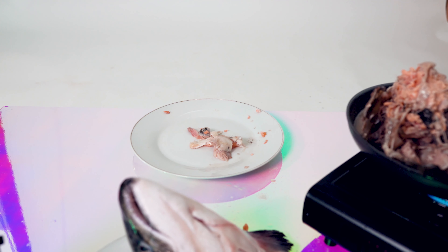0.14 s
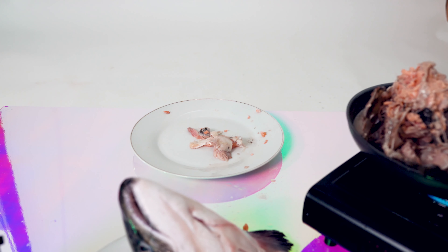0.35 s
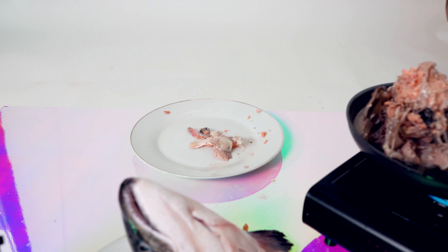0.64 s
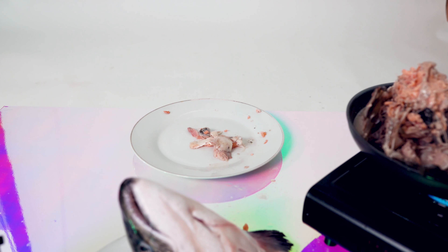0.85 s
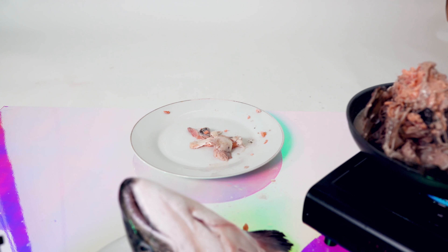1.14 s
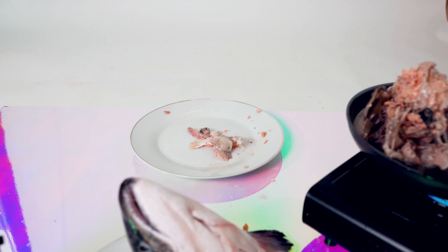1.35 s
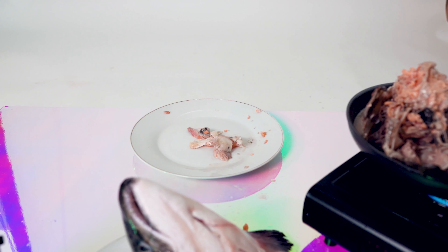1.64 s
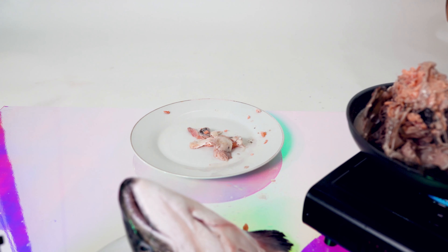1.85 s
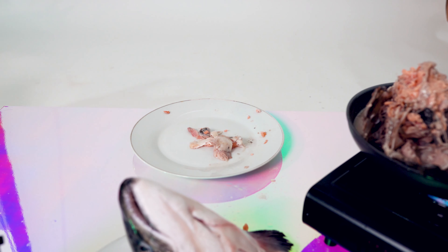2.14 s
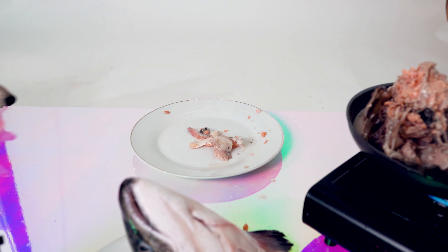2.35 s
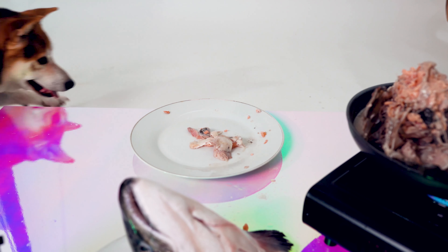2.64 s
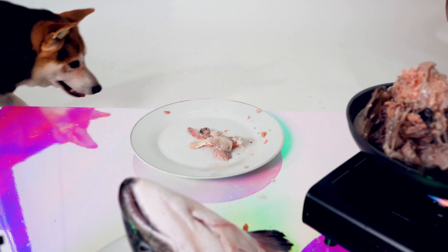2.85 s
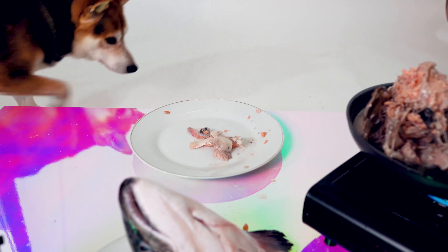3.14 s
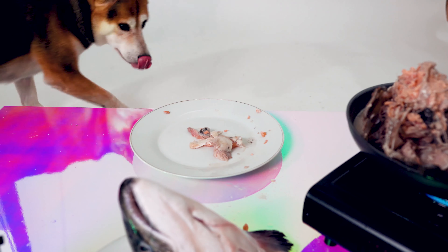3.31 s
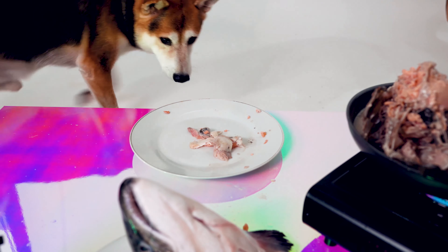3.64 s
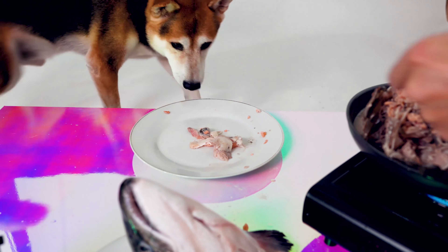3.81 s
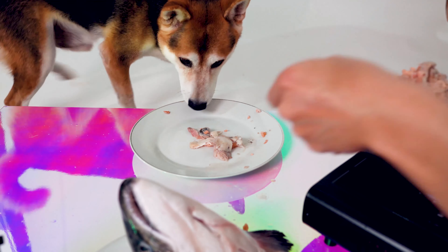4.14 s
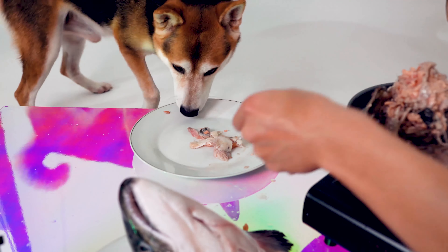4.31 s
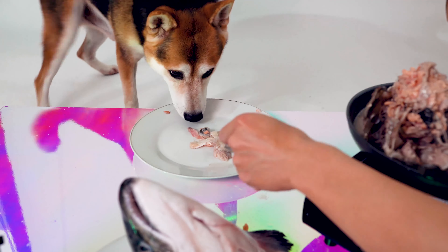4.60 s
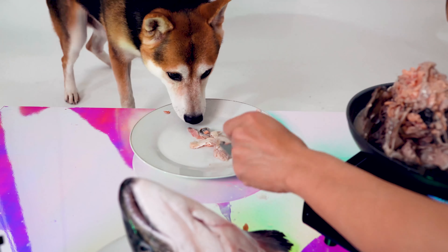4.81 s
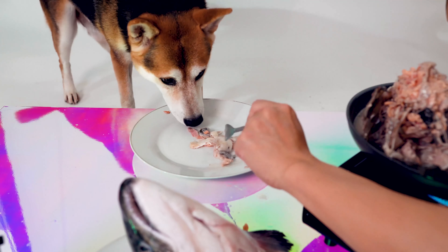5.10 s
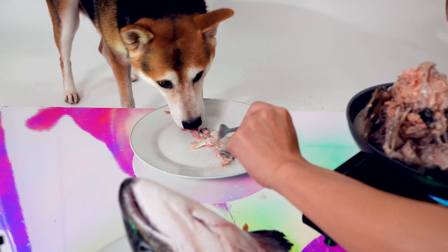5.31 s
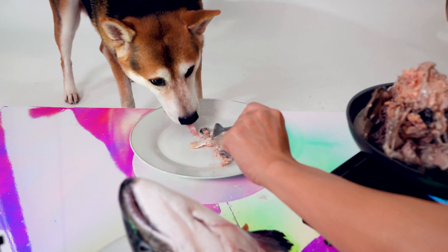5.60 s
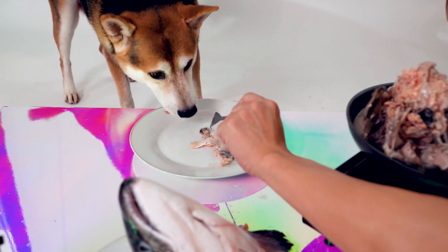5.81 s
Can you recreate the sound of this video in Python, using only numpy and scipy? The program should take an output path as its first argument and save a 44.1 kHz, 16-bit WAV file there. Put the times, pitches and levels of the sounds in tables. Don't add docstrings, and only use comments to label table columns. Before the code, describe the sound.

Metal tags chink sharply, then claws tick and paws thump on a hard table as a dog puffs air over a steady fan hum.

```python
import sys
import numpy as np
from scipy import signal
from scipy.fft import rfft, irfft
from scipy.io import wavfile
from scipy.ndimage import uniform_filter1d

SR = 44100
rng = np.random.default_rng(int(sys.argv[2]) if len(sys.argv) > 2 else 0)


def bounce(signal):
    frames = np.transpose(np.atleast_2d(signal))
    limited = np.clip(frames, -1, 1)
    pcm = np.round(limited * 32767).astype(np.int16)
    wavfile.write(sys.argv[1], SR, pcm)


def elevation(decibels):
    levels = np.asarray(decibels, float)
    return 10 ** (levels / 20)


N = 262836
TIME = np.arange(N) / SR


def unit(x):
    return x / np.sqrt(np.mean(x ** 2))


def colour(x, points, peaks=(), tilt_db=0):
    hz = np.maximum(np.arange(len(x) // 2 + 1) * SR / len(x), 1)
    at, db = np.transpose(points)
    gain = np.interp(np.log(hz), np.log(at), db) + tilt_db * np.log2(hz / 1000)
    for mid, width, top in peaks:
        gain = gain + top / (1 + (2 * (hz - mid) / width) ** 2)
    return irfft(rfft(x) * elevation(gain), len(x))


def band(x, hz, octaves):
    edges = hz * 2. ** (octaves * np.array([-.5, .5]))
    edges = np.minimum(edges, [.4 * SR, .45 * SR])
    return unit(signal.sosfilt(signal.butter(2, edges, "band", fs=SR, output="sos"), x))


def walk(rate):
    k = int(SR / rate)
    steps = np.repeat(rng.standard_normal(N // k + 1), k)
    return uniform_filter1d(uniform_filter1d(steps, k), k)[:N]


def fade(t, t60):
    return np.exp(-np.log(1000) * t / max(t60, .002))


def swell(s, rise, t60):
    climb = np.clip(1 + (TIME - s) / max(rise, .002), 0, 1) ** 2
    return climb * fade(np.maximum(TIME - s, 0), t60)


def add(track, s, x):
    i = int(s * SR)
    track[i:i + len(x)] += x[:N - i]


# f/Hz, density/(dB per Hz)
FAN_AIR = [(15, -29), (25, -11), (40, -10), (52, -32), (90, -7.5), (125, -5.5), (200, -14), (390, -14),
           (1170, -23.5), (1490, -26), (3100, -32), (4410, -36.5), (6500, -39.5), (12000, -39.5),
           (13000, -43.5)]
# f/Hz, width/Hz, level over the hiss/dB
FAN_CAVITIES = [(180, 25, 5.5), (392.3, 7.2, 7.5), (577, 36, 4), (1130, 49, 5.5), (3170, 205, 8),
                (3786, 380, 6.5), (5325, 150, 12.5), (5740, 335, 12), (7040, 80, 1), (8020, 160, 6),
                (8700, 380, 6), (9600, 150, 5.5), (10950, 300, 6), (11940, 250, 7.5), (15000, 400, 1)]
# f/Hz, level/dB rms
MAINS_HUM = [(120, -42.5), (179, -55), (240, -55.5)]


def fan():
    air = colour(rng.standard_normal(N), FAN_AIR, FAN_CAVITIES)
    bass = signal.sosfiltfilt(signal.butter(2, 200, fs=SR, output="sos"), air)
    hiss = air - bass
    scale = elevation(-42) / np.std(hiss)
    hum = np.zeros(N)
    for hz, db in MAINS_HUM:
        level = np.sqrt(2) * elevation(db + 1.42 * walk(16))
        hum += level * np.sin(2 * np.pi * hz * TIME + 0.61 * walk(4.3))
    moving_hiss = elevation(0.25 * walk(5.27)) * hiss
    moving_bass = elevation(-1 + 0.83 * walk(2.46)) * bass
    return scale * (moving_bass + moving_hiss) + hum


# peak t/s, level/dB
WEIGHT_SHIFTS = [(.38, -43), (.85, -42.5), (1.37, -33), (1.59, -39), (2.39, -47), (2.85, -38), (3.37, -42),
                 (3.62, -43), (4.23, -36), (4.85, -35), (5.33, -45), (5.75, -51), (5.94, -42)]


def rumble():
    shake = elevation(-46) + sum(elevation(db) * swell(s, rise=0.12, t60=0.27) for s, db in WEIGHT_SHIFTS)
    return shake * band(rng.standard_normal(N), 76.9, 0.52)


# t/s, peak level/dB, loudest ring f/Hz, rattle/dB, brightness/(dB per
FIRST_CHINKS = [
    (.2424, 0.5, 9800, -2.5, -2.5),
    (.2527, -6.5, 11400, 1.5, -4),
    (.2640, -6, 8300, -2.5, -3),
    (.2720, -32, 8320, 12, 3),
    (.3135, -22, 15000, 0, -2),
]
# f/Hz, level/dB, t60/s
FURRED_TAG = [(2260, -14.5, 0.014), (4210, -14, 0.034), (4870, -19, 0.037), (5360, -13, 0.034),
              (6500, -11, 0.019), (7700, -17, 0.016), (8300, -17, 0.065), (9700, -4.5, 0.014),
              (10070, -3, 0.015), (11300, -2, 0.013), (11400, -6, 0.017), (12800, -1, 0.019),
              (13600, -5, 0.016), (15500, -2, .018)]
# t/s, peak level/dB, loudest ring f/Hz, rattle/dB, brightness/(dB per
LATER_CHINKS = [(.7714, -7.5, 7640, -0.5, 4.3), (.7805, -17, 9900, -3, 5), (.7835, -19, 7730, -3, 6),
                (.786, -17, 9150, -6, 3), (1.3440, -15.5, 9600, 1.5, 3.6), (1.3525, -31, 9660, 7, 3),
                (2.2213, -19.5, 8800, 1, 5.5), (2.2305, -35, 7700, 4, 5), (2.2345, -31, 7300, 5, 5.4),
                (2.4652, -16, 9970, 3, 1), (2.4735, -33, 8700, 4, 3), (2.5265, -28, 10000, -2, 5)]
# f/Hz, level/dB, t60/s
LATER_TAG = [(2420, -1, 0.013), (3100, -10, .025), (4320, -14.5, 0.041), (5700, -20, .025),
             (7080, -8.5, 0.019), (7730, -4.5, 0.014), (8700, -9.5, 0.015), (9340, -4, 0.0093),
             (10040, 1.5, 0.0064), (11420, -3, 0.01), (13500, -16, 0.013), (15500, -13, 0.01)]


def chinks(hits, modes, focus_db, rattle_t60):
    ringing, rattling = np.zeros((2, N))
    t = TIME[:SR // 4]
    hz, db, t60 = np.transpose(modes)
    for s, peak_db, loud_hz, rattle_db, tilt_db in hits:
        scatter_db = 2.5 * rng.standard_normal(len(hz))
        focus = focus_db / (1 + ((hz - loud_hz) / 700) ** 2)
        mix = elevation(db + scatter_db + tilt_db * np.log2(hz / 9000) + focus)
        phase = .9 * rng.standard_normal(len(hz)) - 2 * np.pi * hz * .0011
        ring = np.zeros(len(t))
        for f, g, d, p in zip(hz, mix, t60, phase):
            ring += g * np.sin(2 * np.pi * f * t + p) * fade(t, d)
        rattle = band(rng.standard_normal(len(t)), 13400, 3.5 - 0.24 * tilt_db) * fade(t, rattle_t60)
        strike = elevation(peak_db + 0.5) * (1 - fade(t, 0.0069))
        add(ringing, s, strike * ring / np.sqrt(np.sum(mix ** 2)))
        add(rattling, s, strike * elevation(rattle_db - 5.0) * rattle)
    return np.array([ringing, rattling])


# t/s, peak level/dB, f/Hz, t60/s
TABLE_FLEXES = [(0.38, -33, 56, 0.16), (0.819, -26.5, 84, 0.13), (1.346, -19.5, 76.3, 0.19),
                (2.817, -31, 59.6, 0.24), (2.835, -21, 254, 0.18), (3.965, -31, 345, 0.13),
                (4.814, -26.5, 353, 0.22), (3.699, -30, 64, 0.27), (4.092, -26.5, 75, 0.16),
                (4.122, -22, 80.5, 0.071), (4.211, -34, 72, 0.31), (4.284, -18.5, 214, 0.038),
                (4.838, -37, 85, .25)]


def thumps():
    out, t = np.zeros(N), TIME[:SR // 2]
    for s, peak_db, hz, t60 in TABLE_FLEXES:
        swing = np.sin(2 * np.pi * hz * t) * fade(t, t60)
        add(out, s, elevation(peak_db) * swing * (1 - fade(t, 0.035)))
    return out


# t/s, peak level/dB, f/Hz
CLAW_TAPS = [(1.3474, -31, 2600), (3.3834, -42, 3230), (3.4705, -27.5, 2200), (3.5154, -35, 2400),
             (3.6516, -28, 2310), (3.6775, -26, 2990), (3.9594, -31, 3270), (4.0073, -20, 3200),
             (4.0214, -28, 3620), (4.0344, -32, 3620), (4.0774, -38, 3100), (4.0836, -29, 3060),
             (4.3445, -32.5, 3100), (4.8194, -18.5, 2150), (5.5413, -41, 3150), (5.7773, -38, 1920),
             (5.7907, -31, 3300)]
# t/s, peak level/dB, f/Hz
KNOCKS = [(2.819, -13.5, 778), (2.824, -16.5, 553), (2.831, -17.5, 966), (3.970, -25, 1203),
          (4.607, -34, 1110), (4.723, -24.5, 1147), (4.736, -28, 930), (4.812, -23, 896),
          (4.826, -16.5, 1690), (4.849, -22.5, 1595), (4.933, -32.5, 1620), (5.255, -31, 1130),
          (1.349, -37, 1930), (5.5415, -24.5, 983), (5.778, -29, 820), (5.784, -27, 900),
          (5.790, -30, 1370), (5.805, -36, 1100)]


def ticks(hits, spread, boost_db, t60):
    out, t = np.zeros(N), TIME[:SR // 8]
    for s, peak_db, hz in hits:
        detune = spread * np.array([-1, 0, 1]) + 0.03 * rng.standard_normal(3)
        pitch = hz * np.exp(detune)
        ring = np.sin(2 * np.pi * pitch[:, None] * t).sum(axis=0)
        add(out, s, elevation(peak_db + boost_db) * ring * fade(t, t60) * (1 - fade(t, 0.13 * t60)))
    return out


# t/s, peak level/dB, centre f/Hz, width/octaves
CLAW_SKIDS = [(1.900, -37, 6200, .46), (2.040, -36, 6000, .7), (2.809, -22, 4500, 1.6),
              (2.822, -21, 9000, 1.2), (2.8285, -18, 8900, 0.81), (2.4655, -28, 2980, 0.56),
              (3.3225, -23.5, 7300, .5), (3.326, -28, 5900, 1.5), (3.515, -38, 5500, 1.7),
              (3.655, -38, 9000, 1.2), (3.959, -27.5, 6960, 0.59), (4.0073, -22.5, 9000, 1.2),
              (4.0073, -26, 4430, 0.82), (4.038, -30, 8500, 0.67), (4.078, -35, 8700, 1.1),
              (4.335, -38, 5000, 1.4), (4.340, -36, 7000, 1.1), (4.801, -32, 7000, 1.8),
              (5.398, -34, 8940, .69), (5.403, -37, 8500, .8), (5.494, -39, 13000, .45),
              (5.498, -31, 13000, 0.53), (5.503, -37, 13000, .45), (5.542, -37, 5000, 1.2),
              (5.777, -34, 6000, 1.1), (5.791, -30, 8440, .51), (3.842, -40, 9000, 1.2),
              (3.890, -41, 10500, .8)]


def scratches(hits, boost_db):
    out, t = np.zeros(N), TIME[:SR // 8]
    envelope = fade(t, 0.012) * (1 - fade(t, 0.0018))
    for s, peak_db, hz, octaves in hits:
        burst = band(rng.standard_normal(len(t)), hz, octaves)
        add(out, s, elevation(peak_db + boost_db) * burst * envelope)
    return out


# t/s, level/dB, rise/s, t60/s, brightness/(dB per octave)
LANDINGS = [(2.81, -26.5, 0.0027, 0.11, 0), (2.816, -21.5, 0.0079, 0.27, 2), (3.378, -43, 0.057, .3, 0.5),
            (3.466, -36, 0.0044, 0.28, 0.5), (3.652, -29, 0.031, 0.28, 0.5),
            (3.957, -26, 0.0086, 0.21, -0.5), (4.004, -51, .005, .35, 11), (4.335, -31, 0.0093, 0.19, 0),
            (4.606, -34.5, 0.0038, 0.27, -0.5), (4.806, -23.5, 0.023, 0.13, 0),
            (4.835, -29, 0.0076, 0.27, 0.5), (5.773, -36, 0.014, 0.022, 1)]
# f/Hz, density/(dB per Hz)
PAW_COLOUR = [(70, -18), (130, -9), (250, 1), (400, -3), (900, -10), (1600, -14), (2800, -17), (4300, -19),
              (7000, -32), (10000, -30.5), (15600, -41)]


def paws():
    out, t = np.zeros(N), TIME[:SR // 2]
    for s, db, rise, t60, tilt_db in LANDINGS:
        grain = rng.standard_normal(len(t))
        unevenness_db = 2.5 * np.repeat(rng.standard_normal(len(t) // 90), 90)
        scrabble = unit(colour(grain * elevation(unevenness_db), PAW_COLOUR, tilt_db=tilt_db))
        press = np.minimum(t / max(rise, .001), 1) * fade(np.maximum(t - rise, 0), t60)
        add(out, s, elevation(db) * scrabble * press)
    return out


# peak t/s, hiss level/dB, rise/s, t60/s, duller rub relative/dB
BREATHS = [
    (3.658, -41.5, 0.01, 0.33, 7),
    (3.705, -44, 0.058, .4, -5),
    (4.01, -43, .008, 1, 1),
    (4.04, -55, .01, 0.16, -3),
    (4.518, -37.5, 0.24, .55, -2),
    (4.608, -56, 0.016, 0.73, 16),
    (4.716, -37, 0.071, 0.7, 0),
    (4.802, -41.5, .005, 0.24, 9),
    (5.165, -42.5, 0.091, 0.21, -11),
]
# f/Hz, density/(dB per Hz)
NOSE_HISS = [(3240, -9), (5500, -6), (6300, -5.5), (9080, -3.5), (12200, -8), (14000, -10), (15600, -15)]


def puffs():
    hiss_level, rub_level = np.zeros((2, N))
    for s, db, rise, t60, rub_db in BREATHS:
        breath = swell(s, rise, t60)
        hiss_level += elevation(db) * breath
        rub_level += elevation(db + rub_db - 3.5) * breath
    hiss = hiss_level * unit(colour(rng.standard_normal(N), NOSE_HISS))
    rub = rub_level * band(rng.standard_normal(N), 2470, 1.7)
    return elevation(1.7 * walk(60)) * (hiss + rub)


def room(direct, radiated):
    t = TIME[:SR // 2]
    walls = [(100, 2.5), (1000, -7.0), (6000, -1.5), (10000, -1.0), (13000, -2.0), (16000, -5)]  # f/Hz, dB
    tail = colour(rng.standard_normal(len(t)), walls) * fade(t, 0.38) * (t > .009)
    tail = tail / np.sqrt(np.sum(tail ** 2))
    return direct + elevation(-6) * signal.fftconvolve(radiated, tail)[:N]


def scene():
    first = chinks(FIRST_CHINKS, FURRED_TAG, focus_db=14.0, rattle_t60=0.016)
    later = chinks(LATER_CHINKS, LATER_TAG, focus_db=6.7, rattle_t60=0.008)
    ring, rattle = first + later
    taps = ticks(CLAW_TAPS, spread=0.13, boost_db=0.5, t60=0.013)
    knocks = ticks(KNOCKS, spread=0.191, boost_db=-1.2, t60=0.035)
    feet = scratches(CLAW_SKIDS, boost_db=-3) + taps + knocks + paws()
    radiated = elevation(-6.5) * ring + elevation(2.5) * rattle + feet
    near = room(ring + rattle + feet, radiated)
    mono = near + thumps() + rumble() + puffs() + fan()
    return np.array([mono, mono])


def low_pass(x):
    return signal.sosfilt(signal.butter(12, 16820, fs=SR, output="sos"), x)


def record(dry):
    low = signal.sosfiltfilt(signal.ellip(8, .1, 40, 15900, fs=SR, output="sos"), dry)
    return low_pass(low + elevation(-35) * (dry - low))


dry = scene()
out = record(dry)
bounce(out)
```